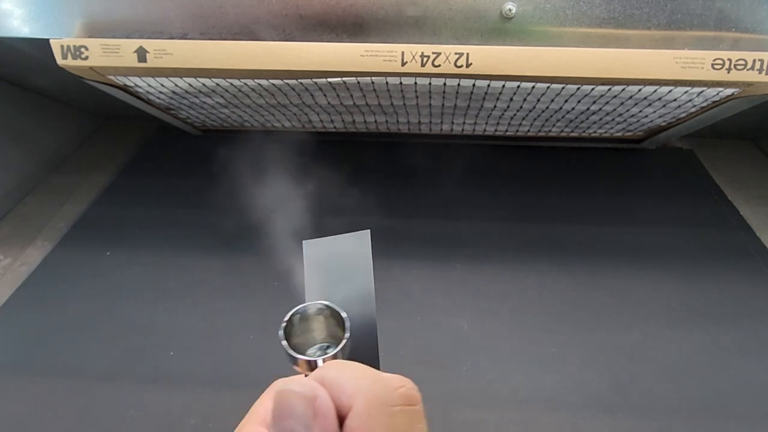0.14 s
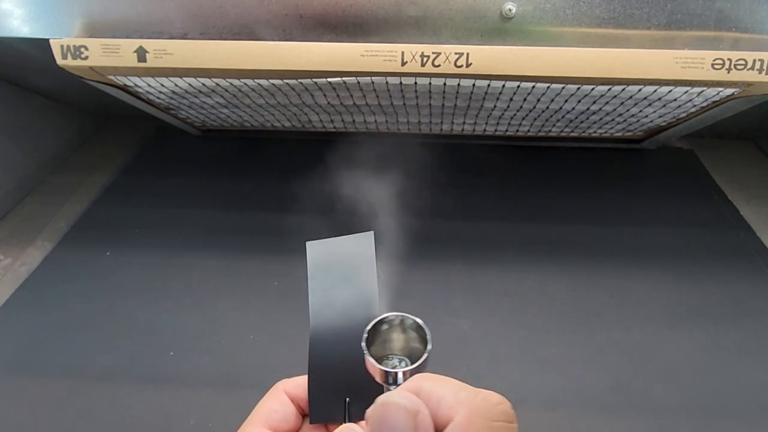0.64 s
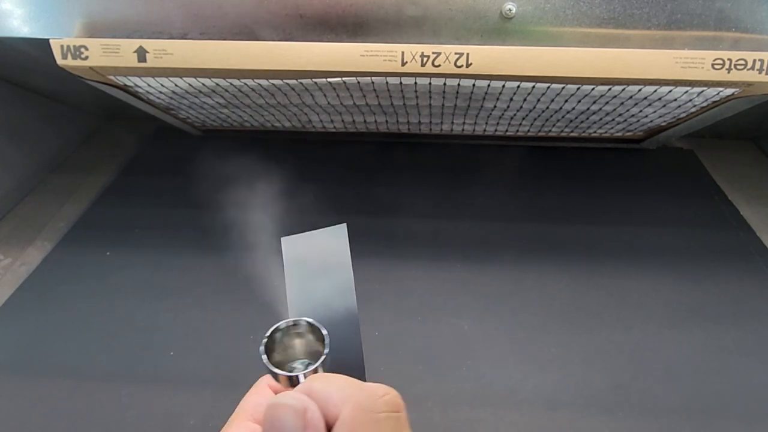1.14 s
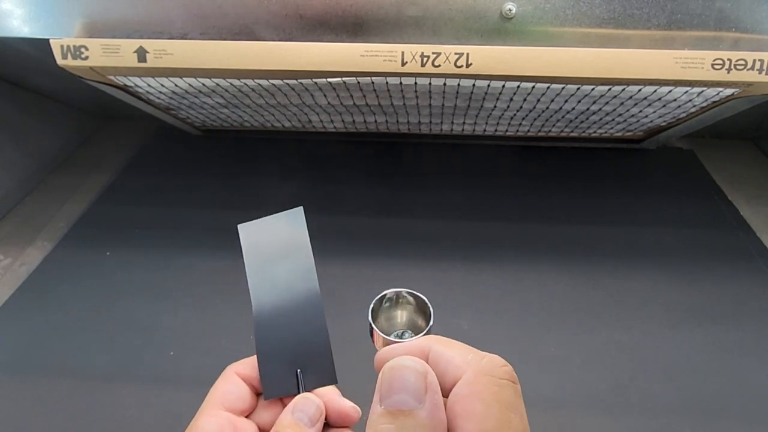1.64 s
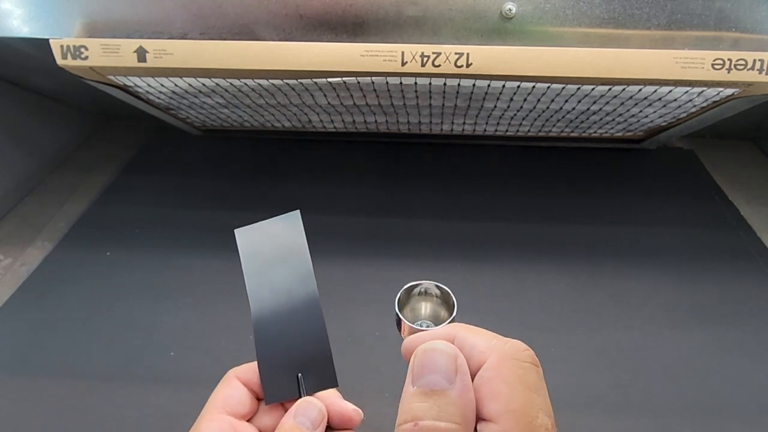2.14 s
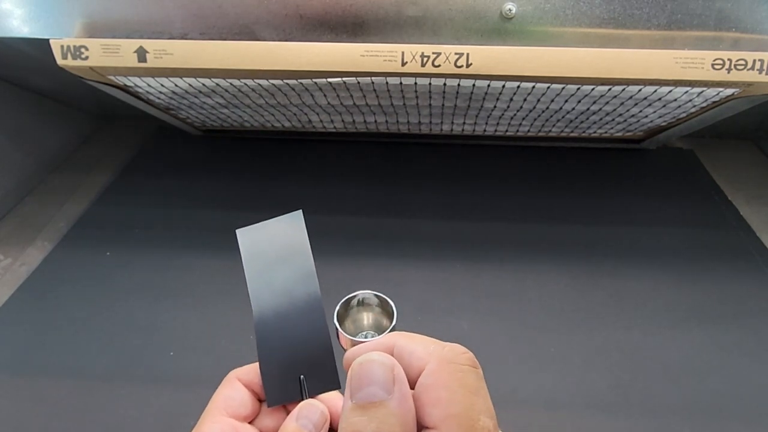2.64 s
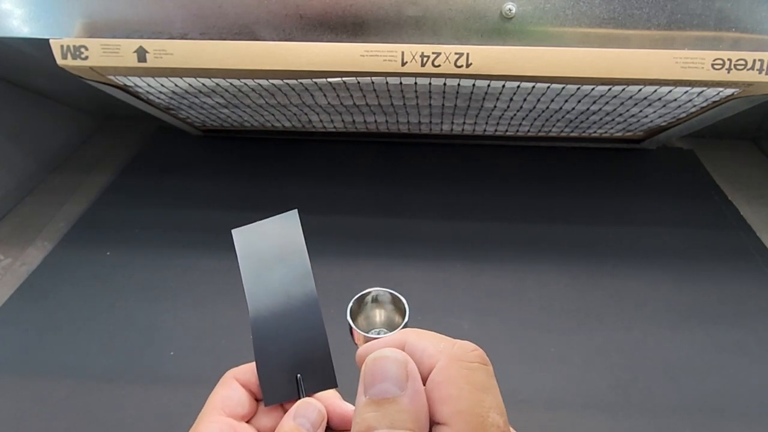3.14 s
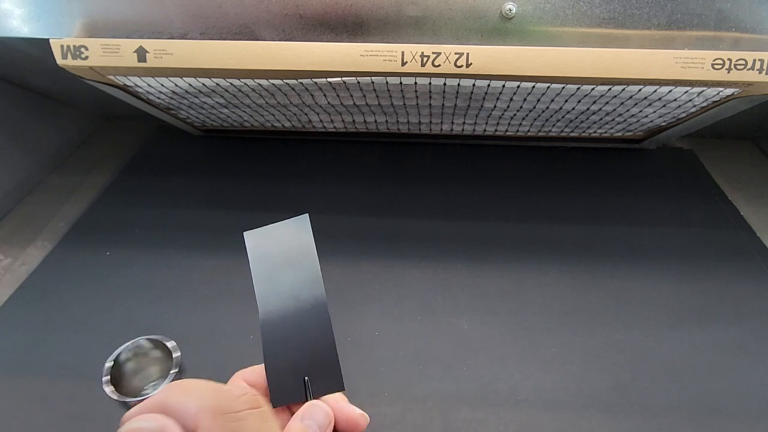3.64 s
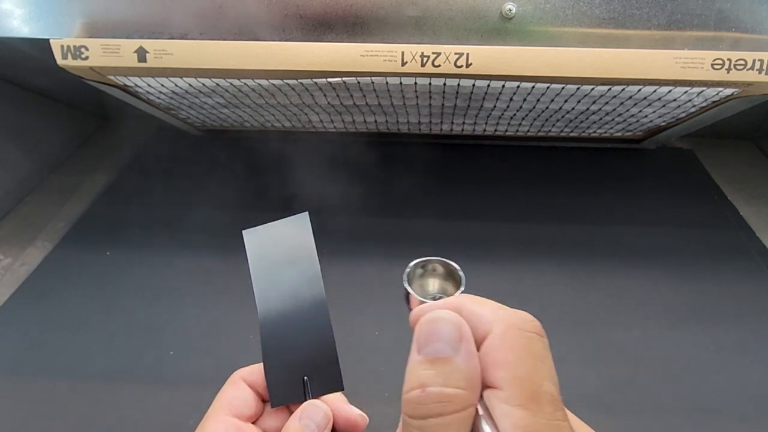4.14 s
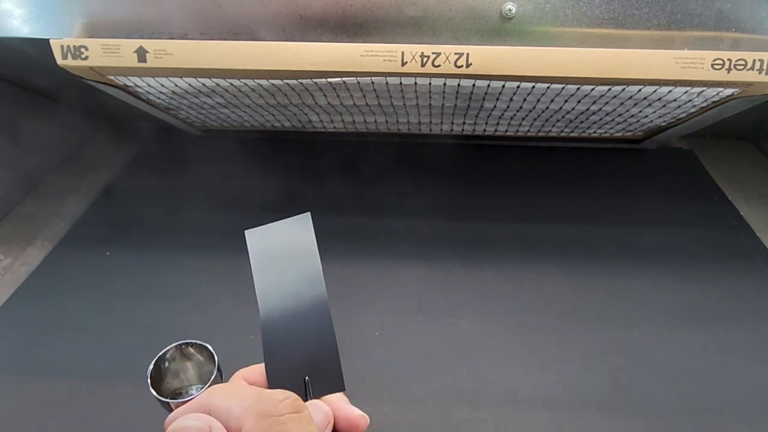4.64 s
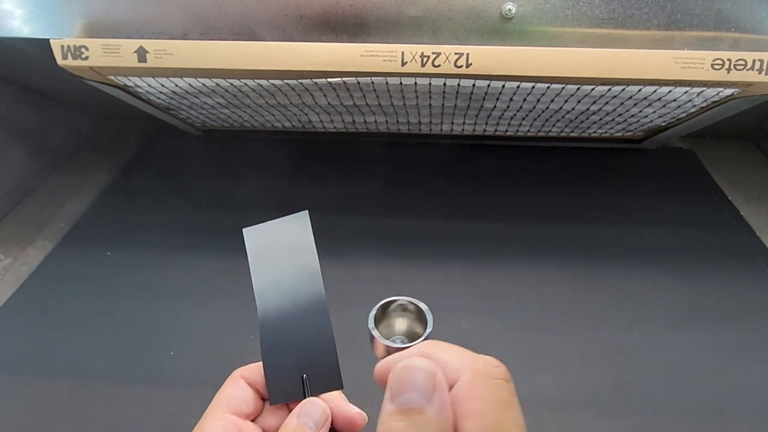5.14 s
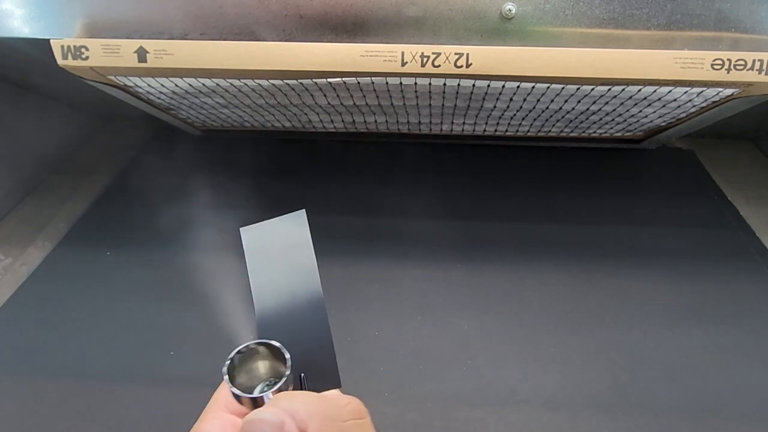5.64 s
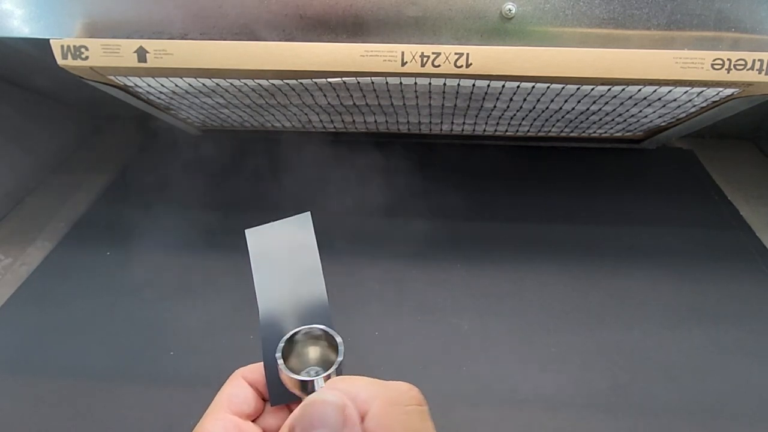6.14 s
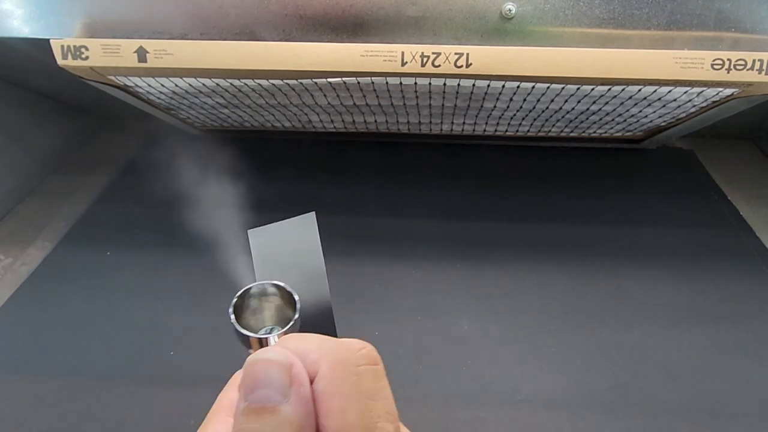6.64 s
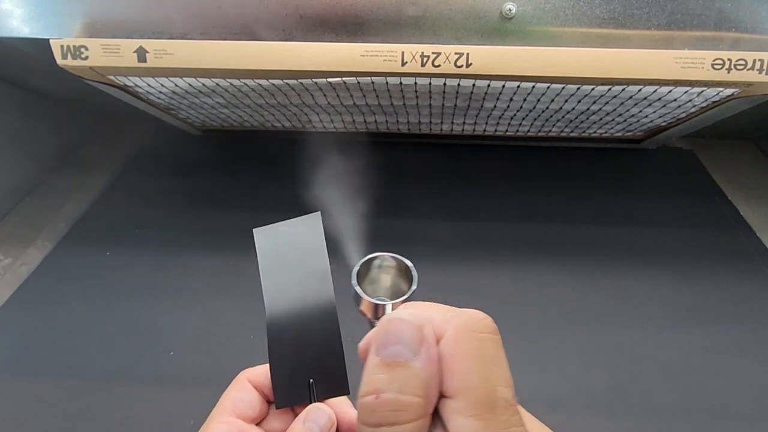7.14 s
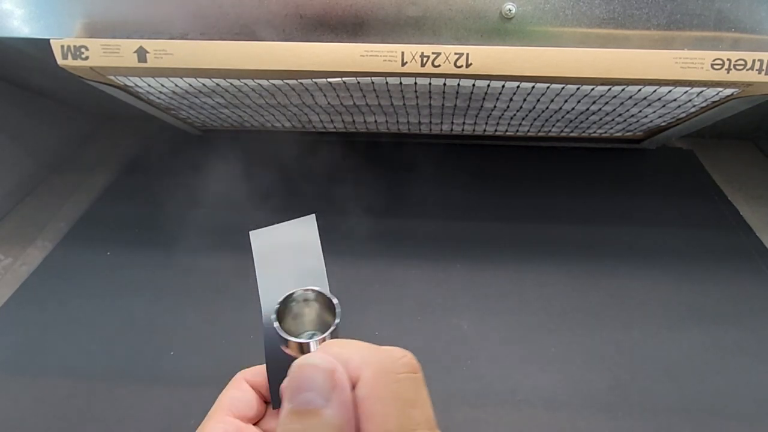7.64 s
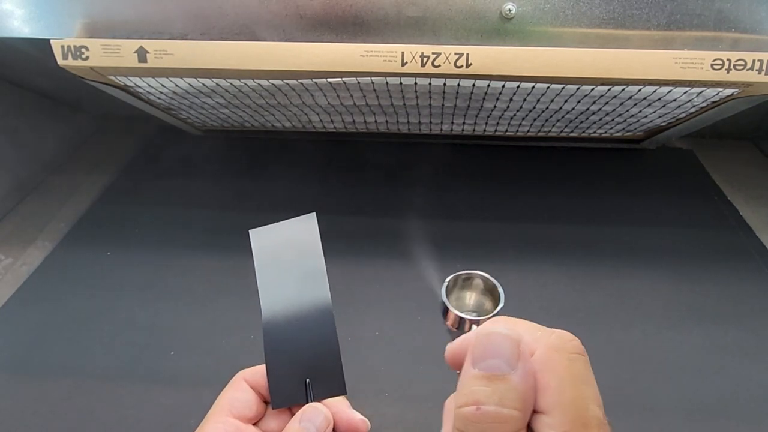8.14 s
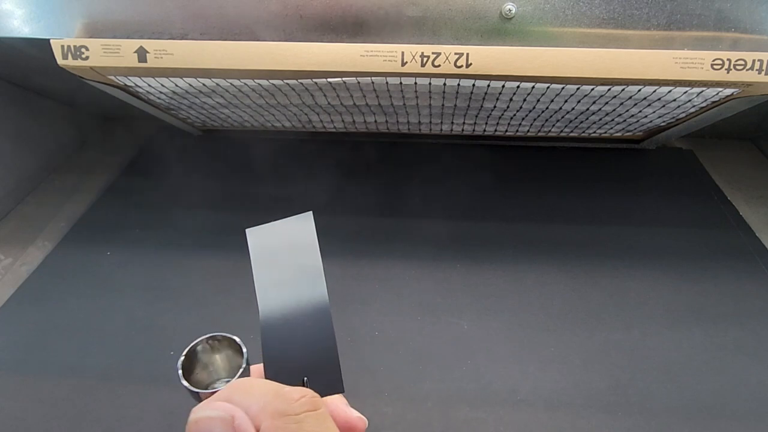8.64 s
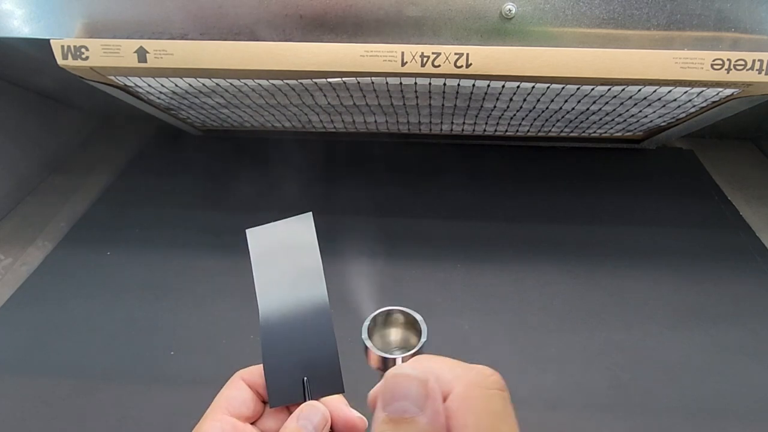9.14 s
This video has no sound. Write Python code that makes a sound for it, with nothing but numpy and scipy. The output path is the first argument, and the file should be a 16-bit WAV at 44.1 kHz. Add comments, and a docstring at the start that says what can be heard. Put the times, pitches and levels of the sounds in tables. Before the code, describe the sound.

Short sharp bursts of airbrush hiss spray a card close up, over a small piston compressor's steady hum and a booth fan's low rush.

```python
"""Airbrush bursts in a spray booth

An airbrush sprays a card in short bursts close to two microphones: shaped noise for the jet and its splash,
with faint leaks between bursts and low whooshes at the card's edge. A small piston compressor hums in sine
waves and puffs once a turn. Two light knocks are heard over the booth fan's steady, slightly patchy noise."""
import sys
import numpy as np
from scipy import signal
from scipy.fft import rfft, irfft, next_fast_len
from scipy.io import wavfile
from scipy.ndimage import uniform_filter1d, map_coordinates

SR = 44100
rng = np.random.default_rng(int(sys.argv[2]) if len(sys.argv) > 2 else 0)


def wav_out(sig):
    """Save sig, one row per channel (or a flat mono array), as 16-bit PCM at SR to the path in sys.argv[1]."""
    wavfile.write(sys.argv[1], SR, np.round(np.clip(np.atleast_2d(sig).T, -1, 1) * 32767).astype(np.int16))


def linear_from_db(decibels):
    """Turn decibels (scalar or array-like) into linear amplitude factors; 0 gives 1."""
    return 10 ** (np.asarray(decibels, float) / 20)


N = 408796  # length of the scene in samples

# One pull of the trigger a row, levels before echoes and left-right balance:
# [start_s, length_s, closing_s, jet_level_db, splash_level_db (compared with the jet)]
TRIGGER_PULLS = [(.029, .33, .06, -31.5, -19), (.487, 0.41, .065, -31.5, -18),
                 (1.042, 0.28, 0.063, -32, -18.5), (3.735, 0.44, 0.079, -31, -21.5),
                 (4.282, 0.34, 0.093, -31.5, -18.5), (4.693, 0.37, 0.091, -31.5, -19),
                 (5.163, 0.34, 0.092, -31.5, -18), (5.548, .36, 0.071, -31, -18),
                 (6.021, 0.28, .09, -31.5, -18), (6.529, 0.44, .07, -31.5, -20),
                 (7.099, .31, 0.085, -31.5, -19.5), (7.500, 0.35, 0.078, -34.5, -15),
                 (8.133, .407, 0.075, -32, -17), (8.684, 0.32, 0.082, -31.5, -19),
                 (9.133, .3, .08, -31.5, -17.5)]
# Colour of the jet with the nozzle held high, before brightening: [frequency_hz, relative_level_db per Hz]
JET_HIGH_COLOUR = [(1530, -46), (2600, -25), (2830, -13), (4030, -14.5), (4620, -8.5), (5030, -13.5),
                   (5760, -9.5), (6960, -1.5), (8480, -5.5), (11000, -7), (14400, 1), (15900, -8.5)]
# Colour of the jet with the nozzle held low, before brightening: [frequency_hz, relative_level_db per Hz]
JET_LOW_COLOUR = [(1530, -26), (2600, -17), (2890, -7.5), (3250, -12.5), (3650, -13.5), (4130, -6.5),
                  (4620, -2.5), (5760, -7), (7290, 0.5), (7920, 0.5), (9720, -4.5), (11200, -1.5),
                  (15000, 2), (15900, -1.5)]
# Colour of the spray hitting the card: [frequency_hz, relative_level_db per Hz]
SPLASH_COLOUR = [(600, -5), (1200, -6.5), (2000, -5), (2900, -4.5), (3400, -20)]
# How much the spray leans to the left at each pitch: [frequency_hz, left_over_right_db]
SPRAY_LEAN = [(3000, -0.5), (5000, 0), (8000, 0), (11000, -3), (15000, 5)]


def airbrush():
    """Turbulent jet and its duller splash on the card; the hand moves, so the echoes keep changing."""
    lowered_s = 2.5  # bursts that start after this have the nozzle held lower
    lean_db, sway_db = 3, 1.9  # left over right, and its drift as the hand sweeps
    halves = np.array([[.5], [-.5]])  # half of a lean goes to each side
    out = np.zeros((2, N))
    for start_s, length_s, closing_s, jet_db, splash_db in TRIGGER_PULLS:
        level = valve(length_s, closing_s)
        size = len(level)
        colour = JET_HIGH_COLOUR if start_s < lowered_s else JET_LOW_COLOUR
        # three noises: one shared by both microphones, then one for each
        jet = hiss(colour, size, channels=3)
        sizzle_db = 0.6 + 0.83 * (jet_db + 32)  # a stronger jet is brighter at the top
        jet = filtered(jet, lambda hz: linear_from_db(sizzle_db / (1 + (10000 / (hz + 1)) ** 6)))
        # the paint atomises unevenly
        flutter_db = 0.53 * wobble(24, size) + 0.55 * wobble(153.7, size) + 0.5 * wobble(7.7, size)
        splash = linear_from_db(splash_db + 1.3 * wobble(14, size)) * hiss(SPLASH_COLOUR, size, channels=3)
        spray = level * linear_from_db(jet_db + flutter_db) * (jet + splash)

        near = linear_from_db(1.24) * moving(spray[:1], SR // 30, echo_db=7.5, t60=0.067)
        near[:, :size] += linear_from_db(-3.5) * spray[1:]  # eddies that radiate toward one microphone only
        with_tail = np.pad(spray[1:], ((0, 0), (0, SR // 4)))
        workshop = booth(with_tail, echo_db=30, t60=0.22)
        near += linear_from_db(-24) * workshop[:, :near.shape[1]]

        near = filtered(near, lambda hz: linear_from_db(along(SPRAY_LEAN, hz) * halves))
        swaying_db = lean_db + sway_db * wobble(9.3, near.shape[1])
        add(out, round(start_s * SR), near * linear_from_db(swaying_db * halves))
    return out


def valve(length_s, closing_s):
    """Pressure builds behind the needle: quick opening, slow sag, then closing ever faster."""
    opening_s, opening_power, closing_power = 0.0077, 6.5, 3.34
    sag_db_per_s = 1.5  # pressure in the hose sinks while the valve is open
    t = np.arange(round(length_s * SR)) / SR
    closing = np.clip(1 - (length_s - t) / closing_s, 0, 1)
    rise = (1 - np.exp(-t / opening_s)) ** opening_power
    fall = (1 - closing ** 2) ** closing_power
    return rise * fall * linear_from_db(-sag_db_per_s * (t - length_s / 2))


def moving(x, hop, echo_db, t60):
    """A source in a moving hand: the echoes cross-fade to new ones every hop samples."""
    out = np.zeros((2, x.shape[1] + SR // 2))
    padded = np.pad(x, ((0, 0), (hop, 2 * hop)))
    fade = np.sin(np.pi * np.arange(2 * hop) / (2 * hop))  # equal power, since the echoes are unrelated
    for start in range(0, x.shape[1] + hop, hop):
        piece = booth(fade * padded[:, start:start + 2 * hop], echo_db, t60)
        out[:, start:start + piece.shape[1]] += piece
    return out[:, hop:hop + x.shape[1] + SR // 4]


def booth(x, echo_db, t60):
    """Direct sound, earlier on the left, and dying random wall echoes, unlike at each microphone."""
    t = np.arange(SR // 8) / SR
    walls = rng.standard_normal((2, len(t))) * linear_from_db(-60 * t / t60)
    walls *= linear_from_db(echo_db) / np.linalg.norm(walls, axis=1, keepdims=True)  # echoes against direct sound
    walls[[0, 1], [0, 8]] += 1  # direct sound reaches the right 8 samples later
    walls /= np.linalg.norm(walls, axis=1, keepdims=True)
    return signal.fftconvolve(x, walls, axes=1)


# Air seeping past the needle, one curve a leak, before the left-right gains: [time_s, thin_hiss_level_db]
LEAKS = [
    [(3.1, -82), (3.14, -70), (3.27, -62), (3.36, -60), (3.44, -64), (3.51, -58), (3.54, -66), (3.64, -70),
     (3.7, -78)],
    [(5.9, -61), (6.0, -71), (6.03, -64)],
]
# Colour of the thin hiss: [frequency_hz, relative_level_db per Hz]
THIN_COLOUR = [(6000, -30), (10000, -5), (12500, -4), (14300, 0), (16000, -2)]
# Colour of the fuller hiss: [frequency_hz, relative_level_db per Hz]
FULLER_COLOUR = [(2500, -25), (4500, -3), (7300, -4), (8500, -10), (11000, -25)]


def seeps():
    """A finger resting on the trigger lets a little air hiss out: thin at first, fuller as the gap widens."""
    out = np.zeros((2, N))
    for leak in LEAKS:
        time_s, level_db = np.transpose(leak)
        start = round(time_s[0] * SR)
        t = np.arange(start, round(time_s[-1] * SR)) / SR
        thin_db = np.interp(t, time_s, level_db)
        fuller_db = -63 + 1.4 * (thin_db + 60.5)  # grows faster than the thin hiss
        thin = linear_from_db(thin_db + 2.8 * wobble(14, len(t))) * hiss(THIN_COLOUR, len(t), channels=2)
        fuller = linear_from_db(fuller_db) * hiss(FULLER_COLOUR, len(t), channels=2)
        add(out, start, linear_from_db([[4.5], [1.5]]) * (thin + fuller))
    return out


# The jet sweeps over an edge of the card: [peak_time_s, peak_level_db]
EDGE_SWEEPS = [(.15, -48), (.53, -60), (.81, -50), (1.28, -45), (3.78, -49), (3.95, -48), (4.05, -45),
               (4.37, -43.5), (4.5, -45), (4.96, -46), (5.22, -42), (5.37, -44), (5.69, -42), (5.83, -44),
               (6.08, -41), (6.75, -53), (7.32, -44.5), (8.46, -45), (8.89, -42), (9.22, -41.5)]
# Colour of the whoosh: [frequency_hz, relative_level_db per Hz]
EDGE_COLOUR = [(200, -25), (500, -4), (1000, -9.5), (1600, -17.5), (2500, -21), (4000, -35)]


def edges():
    """The jet splitting on the card's edge makes a brief low whoosh."""
    t, level = np.arange(N) / SR, np.zeros(N)
    for peak_s, peak_db in EDGE_SWEEPS:
        level += linear_from_db(peak_db) * np.exp(-((t - peak_s) / 0.016) ** 2)
    shared, apart = hiss(EDGE_COLOUR, N), hiss(EDGE_COLOUR, N, channels=2)
    return level * unit(shared + 1.45 * apart)


# Compressor hum before the left-right balance: [multiple_of_turn_rate, level_db]
HUM_HARMONICS = [(1, -70.5), (2, -46.0), (3, -46.4), (4, -37.5), (5, -54), (6, -45), (7, -47), (8, -61),
                 (9, -50.5), (10, -50.5), (11, -57.5), (12, -54), (13, -56), (14, -56.5), (15, -51),
                 (16, -59.5), (17, -62), (18, -66), (20, -72), (21, -64.5), (22, -66), (24, -67), (25, -61),
                 (26, -64.5), (28, -68), (30, -66), (31, -61.5), (32, -58.5), (33, -63.5), (34, -69),
                 (36, -71), (37, -73.5), (38, -73), (40, -70.5)]
# Magnetic hum of the motor, before the left-right balance: [pitch_hz, level_db]
MOTOR_HUM = [(60, -58), (120, -46)]
# Colour of the valve puff: [frequency_hz, relative_level_db per Hz]
PUFF_COLOUR = [(1500, -20), (3000, -1.5), (5500, 0), (8000, -4), (11000, -15), (16000, -20)]
# How alike left and right are, for the compressor hum and the fan: [frequency_hz, likeness from -1 to 1]
LIKENESS = [(30, 0.69), (60, 0.98), (180, 0.98), (550, 0.72), (1650, -0.25), (4970, 0.061), (15000, -0.13)]


def compressor():
    """Steady harmonics of the crank and motor, and a valve puff that starts sharply once a turn."""
    turn_hz = 29.26
    t = np.arange(N) / SR
    turns = turn_hz * t
    hum = np.zeros((2, N))
    # weak, uneven upper harmonics
    upper = [(k, -78 - 0.12 * (k - 41) + 3 * rng.standard_normal()) for k in range(41, 80)]
    for k, level_db in [*HUM_HARMONICS, *upper]:
        apart = half_angle(k * turn_hz) * np.array([[1], [-1]])
        phase = 2 * np.pi * (k * turns + rng.uniform()) + 0.013 * k * wobble(3)
        hum += np.sqrt(2) * linear_from_db(level_db + 0.5 * wobble(4)) * np.sin(phase + apart)
    for pitch_hz, level_db in MOTOR_HUM:
        hum += np.sqrt(2) * linear_from_db(level_db) * np.sin(2 * np.pi * pitch_hz * t)

    since = turns - 0.14  # the puff comes this far into the turn
    puff_number = np.floor(since).astype(int) + 1
    strength_db = 0.8 * rng.standard_normal(int(turns[-1]) + 3)[puff_number]
    age_s = since % 1 / turn_hz
    shape = linear_from_db(strength_db - 60 * age_s / 0.06) * (1 - np.exp(-age_s / 0.0008))
    puff = shape * hiss(PUFF_COLOUR, N, channels=2) * linear_from_db([[-49.3], [-54.8]])
    return hum * linear_from_db([[0.6], [-0.6]]) + puff


# Something light knocks in the room: [start_s, level_db before the fade, fade_by_60_db_s, pitch_hz]
LIGHT_KNOCKS = [(1.66, -39, .04, 1200), (7.648, -38, .25, 1750)]
# Colour of a knock around its pitch: [multiple_of_pitch, relative_level_db per Hz]
KNOCK_COLOUR = [(.5, -22), (.7, -13), (.91, -11), (1, 0), (1.09, -12), (1.66, -11), (2.3, -40)]


def knocks():
    """Short dull rattles of a light object: noise gathered around a pitch, dying away."""
    out, t = np.zeros((2, N)), np.arange(SR // 4) / SR
    for start_s, level_db, t60, pitch_hz in LIGHT_KNOCKS:
        colour = [(k * pitch_hz, colour_db) for k, colour_db in KNOCK_COLOUR]
        shape = linear_from_db(level_db - 60 * t / t60) * (1 - np.exp(-t / 0.0018))
        add(out, round(start_s * SR), shape * hiss(colour, len(t), channels=2))
    return out


# Colour of the fan's rush: [frequency_hz, relative_level_db per Hz]
FAN_COLOUR = [(15, -42), (30, -10.5), (70, -15.5), (110, -4), (140, 2), (165, -4), (230, -12), (330, -15.5),
              (520, -16), (575, -25), (630, -24), (680, -31), (760, -26), (855, -26.5), (950, -27.5),
              (1200, -29), (1750, -29), (2200, -34), (3400, -39), (8000, -50.5), (11000, -61), (16000, -59)]


def fan():
    """Air rushing through the booth's filter: alike in the bass, unrelated in the treble, a little patchy."""
    spectra = signal.stft(rng.standard_normal((2, N)), nperseg=512)[2]
    patches = uniform_filter1d(rng.standard_normal(spectra.shape[1:]), 5, 0)  # smooth over frequency
    patches = uniform_filter1d(patches, 12, 1)  # and over time
    pair = signal.istft(spectra * linear_from_db(0.8 * unit(patches)), nperseg=512)[1][:, :N]

    def shares(hz):
        return linear_from_db(along(FAN_COLOUR, hz)) * [np.cos(half_angle(hz)), np.sin(half_angle(hz))]

    mid, side = filtered(pair, shares)
    return linear_from_db([[-35.5], [-36.5]]) * unit(np.array([mid + side, mid - side]))


def half_angle(hz):
    """Half the angle between left and right whose cosine is their likeness."""
    return np.arccos(np.clip(along(LIKENESS, hz), -1, 1)) / 2


def hiss(colour, size, channels=1):
    """Coloured noise of rms 1."""
    return unit(filtered(rng.standard_normal((channels, size)), lambda hz: linear_from_db(along(colour, hz))))


def filtered(x, response):
    """x with each frequency multiplied by response(hz)."""
    m = next_fast_len(x.shape[-1] + 8192)  # silence added so the end does not wrap onto the start
    return irfft(rfft(x, m) * response(np.fft.rfftfreq(m, 1 / SR)), m)[..., :x.shape[-1]]


def along(points, hz):
    """Reads a curve of (Hz, value) points on a log frequency axis."""
    point_hz, value = np.transpose(points)
    return np.interp(np.log(hz + 1), np.log(point_hz + 1), value)


def wobble(rate, size=N):
    """A smooth random curve, rate knots a second."""
    knots = rng.standard_normal(int(size * rate / SR) + 4)
    return map_coordinates(knots, [np.arange(size) * rate / SR])


def unit(x):
    """Scaled to rms 1."""
    return x / np.sqrt(np.mean(x ** 2) + 1e-20)


def add(out, start, x):
    """Mixes x into out from sample start."""
    out[:, start:start + x.shape[1]] += x[:, :N - start]


def scene():
    """All sources as the two microphones get them."""
    return airbrush() + seeps() + edges() + compressor() + knocks() + fan()


def low_pass(x):
    """Removes everything above the highest recorded frequency."""
    return signal.sosfilt(signal.butter(12, 16970, fs=SR, output="sos"), x)


def record(dry):
    """A steep band limit: the top fades over 150 Hz and is gone at 15860 Hz."""
    mix = filtered(dry, lambda hz: np.clip((15860 - hz) / 150, 0, 1))
    return low_pass(mix)


dry = scene()
out = record(dry)
wav_out(out)
```